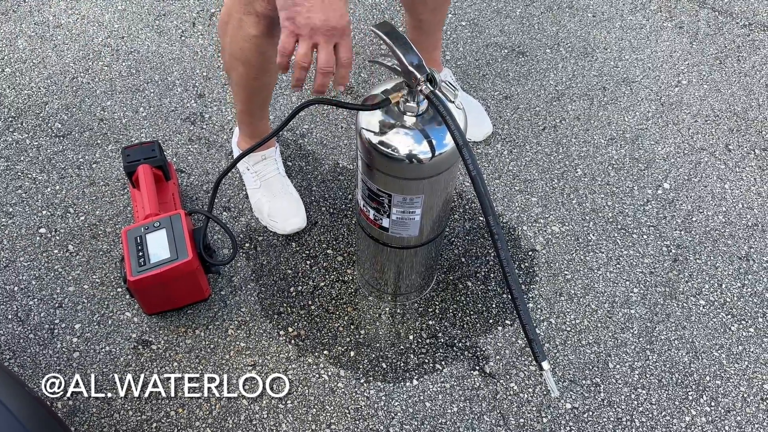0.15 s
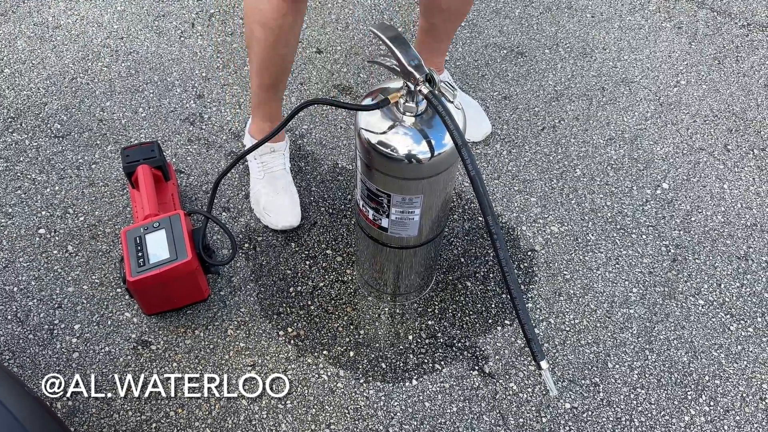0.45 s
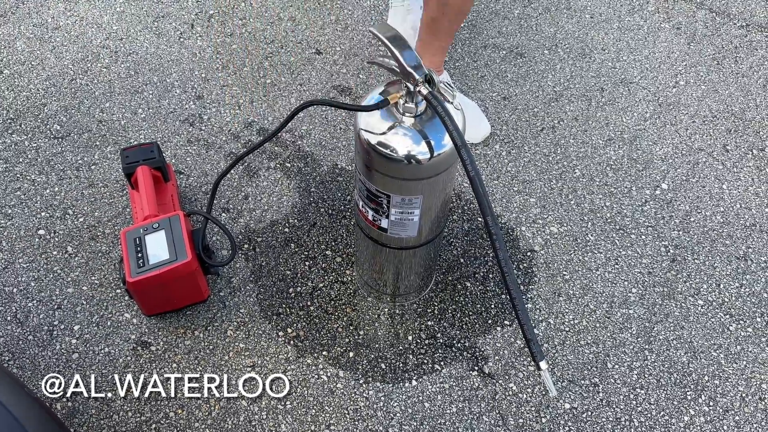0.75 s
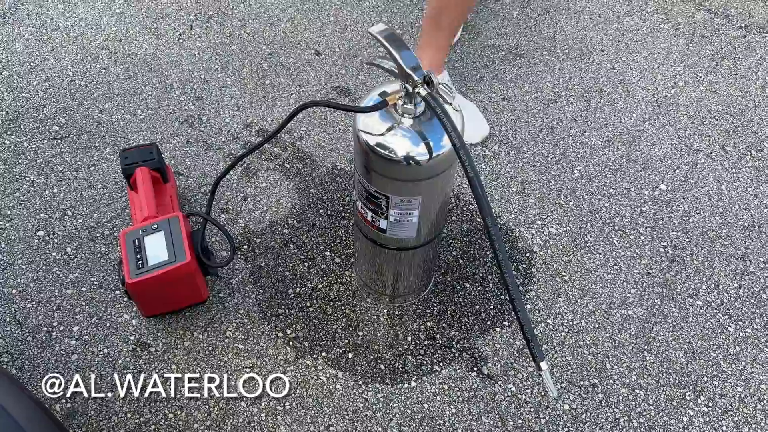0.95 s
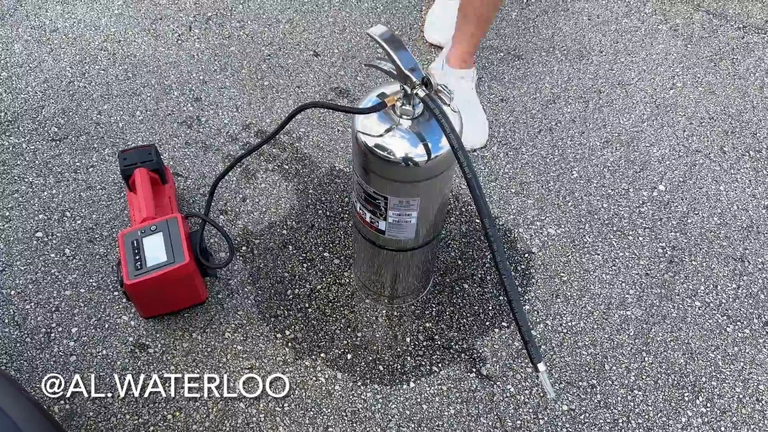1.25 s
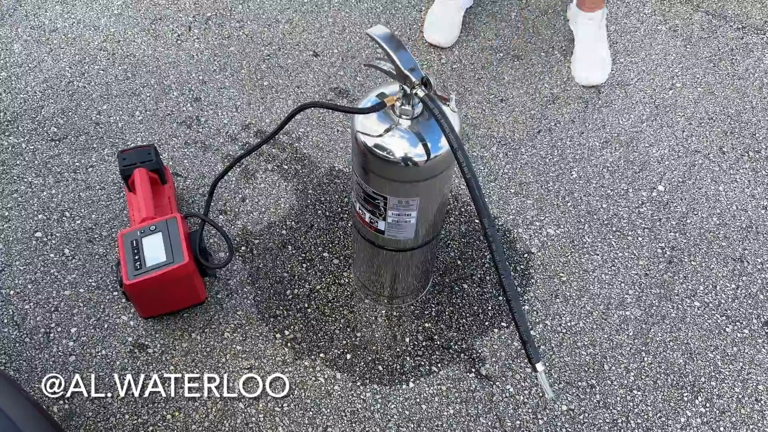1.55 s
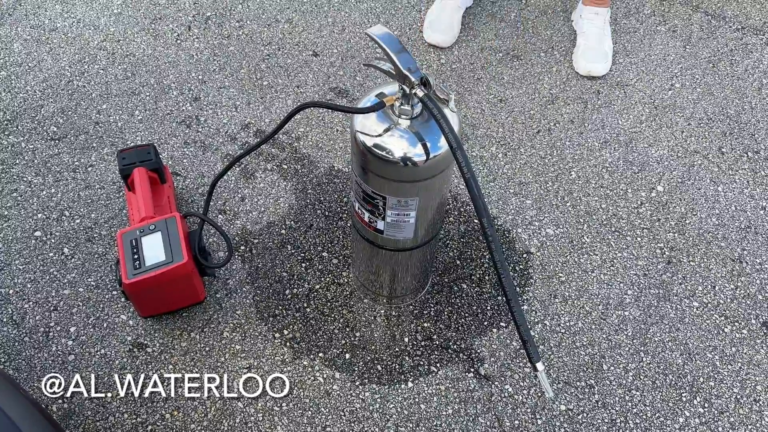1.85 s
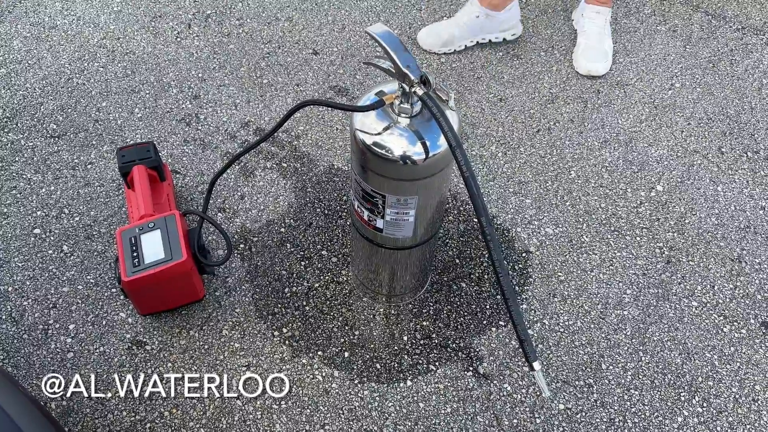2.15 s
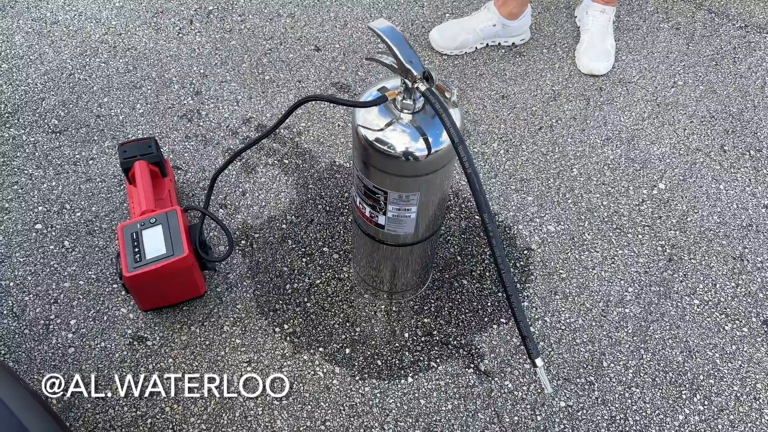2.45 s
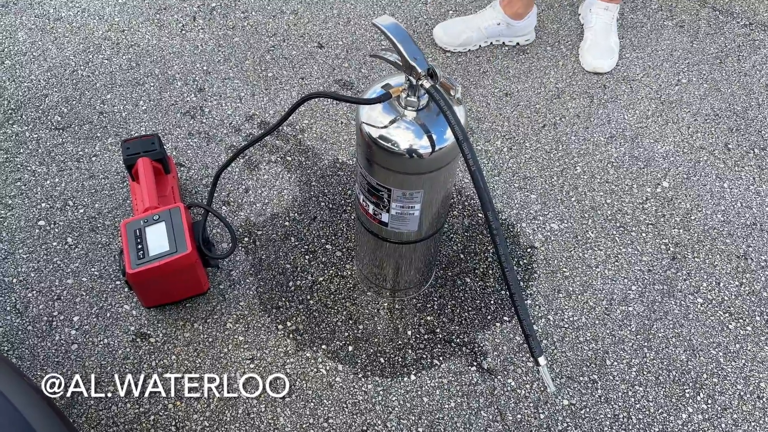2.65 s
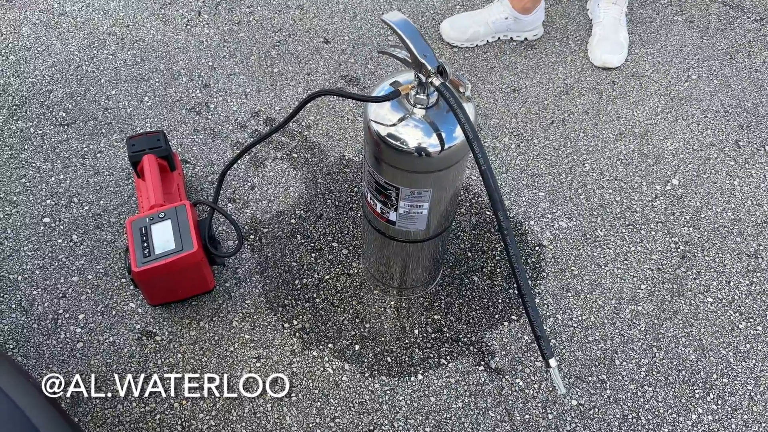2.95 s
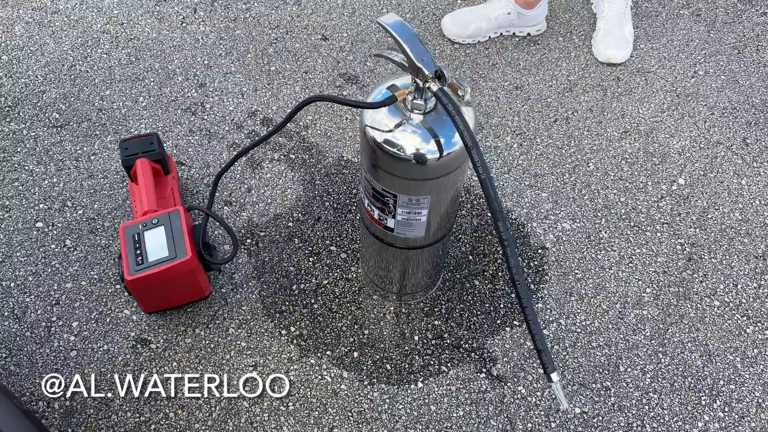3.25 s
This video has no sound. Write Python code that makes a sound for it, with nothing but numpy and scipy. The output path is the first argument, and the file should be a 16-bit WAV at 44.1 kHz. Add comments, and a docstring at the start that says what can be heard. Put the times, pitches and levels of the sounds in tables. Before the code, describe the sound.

A small electric air compressor buzzes steadily outdoors, with light wind and late metallic ticking.

```python
"""Open asphalt, a stereo pair of microphones close to a small electric piston compressor filling a steel tank.
From the start each stroke gives a thump, a valve knock and a puff of air, a loose metal part chatters
faintly, and wind buffets the microphones. The speed sags slightly as pressure builds.
From 1.8 s the loose part ticks, more and more often; just after 3 s the strongest gust comes in."""
import sys
import numpy as np
from scipy import signal
from scipy.fft import rfft, irfft, next_fast_len
from scipy.io import wavfile
from scipy.ndimage import uniform_filter1d

SR = 44100
rng = np.random.default_rng(int(sys.argv[2]) if len(sys.argv) > 2 else 0)


def store_wav(level_fs):
    """Save 16-bit WAV to argv[1]."""
    pcm = np.round(np.clip(np.atleast_2d(level_fs), -1, 1) * 32767)
    wavfile.write(sys.argv[1], SR, pcm.T.astype(np.int16))


N = 149940

RING_SAMPLES = 3000
VALVE_LEAD_TURNS = .07  # the valve acts this far ahead of the thump
# how hard the valve plate buzzes and rings: t/s, level change/dB
VALVE_EFFORT = [(0, 2), (.6, 0), (1.9, -0.5), (2.3, 0.5), (3.4, 3)]


def gain_of(db):
    return 10 ** (np.asarray(db) / 20)


def unit_rms(x):
    return x / np.sqrt(np.mean(x ** 2) + 1e-20)


def over_frequency(table, hz):
    f, value = np.transpose(table)
    return np.interp(np.log(hz + 1), np.log(f + 1), value)


def over_time(table, column=1):
    rows = np.array(table)
    return np.interp(np.arange(N) / SR, rows[:, 0], rows[:, column])


def drift(top_hz=3):
    """Slow random wander, rms 1."""
    t = np.arange(0, N + 256, 256) / SR
    rates = np.geomspace(.2, top_hz, num=12)
    slow = sum(np.sin(2 * np.pi * (f * t + rng.random())) / np.sqrt(f) for f in rates)
    return np.interp(np.arange(N) / SR, t, unit_rms(slow))


def stereo_noise(colour, likeness, pan=((1, 0), (2, 0))):
    """Coloured noise, partly alike at the two microphones, rms 1."""
    size = next_fast_len(N)
    hz = np.fft.rfftfreq(size, 1 / SR)
    a, b = rfft(rng.standard_normal((2, size)))
    like = np.clip(over_frequency(likeness, hz), -1, 1)
    tilt = gain_of(over_frequency(pan, hz) / 2)
    pair = np.array([a * tilt, (like * a + np.sqrt(1 - like ** 2) * b) / tilt])
    return unit_rms(irfft(pair * gain_of(over_frequency(colour, hz)), size)[:, :N])


def ring(hz, t60, rad=0):
    """One mode of struck metal dying away."""
    t = np.arange(RING_SAMPLES) / SR
    return gain_of(-60 * t / t60) * np.sin(2 * np.pi * hz * t + rad)


def crank_turns(start_hz=78.15, sag_hz_per_s=.1282):
    """Crank position, slowing as pressure builds; whole numbers are the thumps."""
    t = np.arange(N) / SR
    return -.078 + start_hz * t - sag_hz_per_s * t ** 2 / 2


def stroke_samples(lead_turns):
    return np.nonzero(np.diff(np.floor(crank_turns() + lead_turns)))[0]


def pump():
    """The piston's buzz: harmonics (orders) of the stroke rate, the high ones wavering more."""
    # harmonics of the pump body: order, left level/dB, right level/dB
    body_orders = [(1, -33.5, -34.5), (2, -34.5, -34.5), (3, -34, -35), (4, -29.5, -29), (5, -27.5, -28),
                   (6, -26.5, -26.5), (7, -24.5, -24.5), (8, -34, -34), (9, -34.5, -34), (10, -39, -40),
                   (11, -43, -48), (12, -46.5, -51), (13, -46.5, -50.5), (14, -48.5, -48), (15, -38, -39),
                   (16, -57, -53), (17, -55, -57), (18, -55.5, -51.5), (19, -52, -52), (20, -54, -52.5),
                   (21, -57, -54), (22, -64, -63), (23, -59, -66), (24, -49, -57), (25, -52, -59),
                   (26, -52, -61), (27, -44.5, -60.5), (28, -49, -52), (29, -53.5, -55), (30, -62.5, -59)]
    # buzz of the valve plate: order, left level/dB, right level/dB
    plate_orders = [(53, -70, -74), (54, -64, -68), (55, -58.5, -63.5), (56, -60, -66), (57, -65, -72),
                    (59, -68, -72), (60, -62, -69)]
    # timing of each band of harmonics within the stroke, shaping the thump and knock:
    # top order, lead on the thump/turns, lag at the right microphone/turns
    band_timing = [(3, 0, .012), (4, .025, .006), (7, 0, .006), (8, .022, .012), (12, .312, .015),
                   (15, .328, .01), (23, .31, .019), (25, .1825, .015), (32, .163, .003), (64, .03, 0)]
    # casing resonances shifting as pressure builds: order, level slope/(dB/s)
    casing_creep = [(8, 0), (9, -.7), (12, -1.6), (13, 2), (15, 0), (25, 0), (26, 2.5), (27, 0), (57, 0),
                    (60, 1.5)]
    # swell of the lowest hum: t/s, level change/dB
    hum = [(0, -13), (1.3, -1), (1.5, 0), (3.15, 3), (3.25, -8), (3.4, -11)]
    # wavering gear whine: t/s, left change/dB, right change/dB
    gear_whine = [(0, -6, -4), (.22, -6, -4), (.32, -1, 0), (.52, 1, 4), (.61, -7, -5), (.7, -4, 0),
                  (.88, -16, -19), (1.0, 1, -3), (1.17, -3, -6), (1.33, -1, 2), (1.46, -5, -3),
                  (2.5, 0, -1), (3.4, 7, 3)]
    # a rasp that swells and sinks: t/s, left change/dB, right change/dB
    rasp = [(0, -5, -8), (.4, -5, -6), (.55, 0, -8), (1.1, 3, 4), (1.3, -2, -10), (2.5, 0, -6), (2.9, 2, 6),
            (3.4, 0, 7)]
    turn, out = crank_turns(), np.zeros((2, N))
    shimmer = np.interp(turn + .5, np.arange(300), rng.standard_normal(300))  # stroke to stroke
    for order, *side_db in list(body_orders) + plate_orders:
        lead, lag = next(band[1:] for band in band_timing if order <= band[0])
        waver_rad = .012 * drift()
        waver_db = .7 + .0015 * min(order, 28) ** 2
        creep_db = np.interp(order, *np.transpose(casing_creep)) * (np.arange(N) - N / 2) / SR
        for side in range(2):
            db = side_db[side] + waver_db * drift() + creep_db + .31 * shimmer
            if order == 1:
                db += over_time(hum)
            elif order == 15:
                db += over_time(gear_whine, column=1 + side)
            elif order == 24:
                db += over_time(rasp, column=1 + side)
            elif order > 32:  # valve plate
                db += over_time(VALVE_EFFORT) + 1.5 * shimmer
            crank_rad = 2 * np.pi * (turn + lead - side * lag) + waver_rad + side * .008 * drift()
            out[side] -= np.sqrt(2) * gain_of(db) * np.cos(order * crank_rad)
    return out


def valve_knock(jitter_s=.00002, spread_db=1.5):
    """One uneven blow per stroke rings the valve plate."""
    # modes of valve plate and casing: f/Hz, t60/s, left level/dB, right level/dB
    plate_modes = [(4300, 0.026, -75, -73), (5860, 0.04, -64, -67), (6180, 0.041, -64.5, -66.5),
                   (8840, 0.054, -79, -68.5)]
    at = stroke_samples(VALVE_LEAD_TURNS)
    draws = rng.standard_normal((len(at), 1 + len(plate_modes)))
    at = np.clip(at + np.round(draws[:, 0] * jitter_s * SR).astype(int), 0, N - 1)
    out = np.zeros((2, N))
    for k, (hz, t60, left_db, right_db) in enumerate(plate_modes):
        blows = np.zeros(N)
        blows[at] = gain_of(spread_db * draws[:, k + 1])
        out += gain_of([[left_db], [right_db]]) * unit_rms(signal.oaconvolve(blows, ring(hz, t60))[:N])
    return gain_of(over_time(VALVE_EFFORT)) * out


def air_puffs(level_db=-39.5, puff_db=-11, decay_turns=.17):
    """Air hisses, with a puff each time the valve acts."""
    # spectrum of the air hiss, with a band near 10.4-12.3 kHz cut out by audio coding:
    # f/Hz, relative level/dB
    colour = [(200, -20), (550, -11), (1000, -22), (1700, -22.5), (2150, -22), (2700, -29), (3100, -30),
              (4400, -27), (5200, -34), (6000, -31.5), (7000, -33), (7900, -37.5), (9600, -35),
              (10200, -39), (10600, -76), (12100, -82), (12600, -36.5), (15500, -34.5)]
    # likeness of the hiss at the two microphones: f/Hz, correlation
    likeness = [(300, 1), (1400, 0.32), (6000, 0.2), (13000, 0.29)]
    # the low hiss sits to the left: f/Hz, left minus right/dB
    pan = [(700, 14.5), (2400, 5), (4400, 4.5), (8100, 2.5), (13000, -0.5)]
    puffs = gain_of(puff_db) * np.exp(-((crank_turns() + VALVE_LEAD_TURNS) % 1) / decay_turns)
    flow = unit_rms(1 + uniform_filter1d(puffs, size=20))
    return gain_of(level_db) * stereo_noise(colour, likeness, pan) * flow


def wind(lump_db=2.5):
    """Wind buffets the microphones: lumpy rumble, brighter flutter and a few single bumps."""
    # strength of the gusts: t/s, rumble level/dB, flutter level/dB
    gusts = [(0.0, -50, -50), (.27, -46, -35), (.66, -55, -44), (.85, -45, -37), (1.49, -42, -38),
             (1.62, -42, -46), (3.1, -37, -42), (3.2, -33, -32), (3.4, -27, -33)]
    # spectrum of the rumble: f/Hz, relative level/dB
    rumble_colour = [(10, -49), (25, -21.5), (40, 1.5), (60, 5), (90, 2), (130, -2.5), (250, -46.5),
                     (1000, -100)]
    # spectrum of the flutter: f/Hz, relative level/dB
    flutter_colour = [(20, -64.5), (50, -19), (100, -3.5), (150, -1), (250, -2.5), (350, -8), (600, -24.5),
                      (1200, -62.5), (4000, -110)]
    # single buffets: t/s, envelope peak/dB, f/Hz, length/s
    buffets = [(.25, -22.5, 79.5, 0.036), (1.155, -23, 72.5, 0.026), (2.325, -20, 75, 0.033),
               (2.808, -18, 190, 0.0075), (2.826, -15.5, 77.6, 0.036), (3.19, -23, 71.6, 0.032)]
    t = np.arange(N) / SR
    likeness = [(1, .55), (2, .55)]  # the same at all frequencies
    rumble_db = 2.5 + over_time(gusts) + lump_db * drift(top_hz=17)
    rumble = gain_of(rumble_db) * stereo_noise(rumble_colour, likeness)
    flutter_db = 3.5 + over_time(gusts, column=2) + lump_db * drift(top_hz=30)
    flutter = gain_of(flutter_db) * stereo_noise(flutter_colour, likeness)
    bumps = sum(gain_of(db) * np.exp(-(2 * (t - s) / length) ** 2) * np.sin(2 * np.pi * hz * (s - t))
                for s, db, hz, length in buffets)
    return rumble + flutter + bumps


def metal_tick(low_db, mid_db, hiss, snap_t60_s=.049, rise_s=.00074):
    """One blow on the loose part: a snap of noise and its modes, a little different each time."""
    # modes of the loose part: f/Hz, relative level/dB, t60/s
    modes = [(3047, 10.5, 0.031), (5910, -12.5, 0.032), (6900, -4, 0.045), (9050, -9.5, 0.036),
             (9480, -5.5, 0.048), (14400, -10, .012)]
    level_draw, pitch_draw, right_rad = rng.standard_normal((3, len(modes)))
    t = np.arange(hiss.shape[1]) / SR
    out = gain_of(-2 - 60 * t / snap_t60_s) * hiss
    for k, (hz, db, t60) in enumerate(modes):
        db += 1.5 * level_draw[k] + (hz < 4000) * low_db + (4000 < hz < 8000) * mid_db
        hz *= 1 + (.03 if hz < 4000 else .006) * pitch_draw[k]
        out += gain_of(db) * np.array([ring(hz, t60), ring(hz, t60, right_rad[k])])
    return out * np.minimum(t / rise_s, 1)


def loose_part(spread_db=2.5):
    """A loose metal part chatters faintly just after every thump and, later on, ticks loudly."""
    # spectrum of the tick's snap, with a band near 10.4-12.3 kHz cut out by audio coding:
    # f/Hz, relative level/dB
    snap_colour = [(2000, -20), (3000, 4), (7000, 4), (8000, -2.5), (10000, 2.5), (10500, -28.5),
                   (12000, -19), (12600, 3), (15500, -2)]
    # likeness of the snap at the two microphones: f/Hz, correlation
    snap_likeness = [(3000, 0.3), (8000, .3), (13000, .8)]
    # strength of the chatter: t/s, gain/dB
    chatter = [(0, -57.5), (2.4, -56), (2.6, -50), (2.9, -51), (3.2, -43.5), (3.4, -44)]
    # the loud blows: t/s, gain/dB, low mode change/dB, middle modes change/dB
    ticks = [(1.775, -45, -13, -6), (2.1097, -43, -16, -8), (2.4679, -40.5, -12, -8), (2.52, -46, -20, -12),
             (2.5971, -45, -7, -8), (2.6108, -42, -14, 0), (2.6752, -38, -8, -12), (2.7263, -41, -13, 5),
             (2.8305, -44, -7, 3), (2.9563, -38.5, -7, 1), (3.0345, -37.5, -7.5, 4), (3.088, -40, -15, 5),
             (3.1628, -39, -6, 2), (3.2137, -36, -15, -2), (3.266, -41, -8, 3), (3.281, -40, -15, -8),
             (3.3173, -42, -9, 0), (3.393, -39, -6, 0)]
    out = np.zeros((2, N + RING_SAMPLES))
    hiss = np.tile(stereo_noise(snap_colour, snap_likeness), 2)
    snaps = np.split(hiss[:, :24 * RING_SAMPLES], 24, axis=1)
    taps = [metal_tick(low_db=-12.5, mid_db=0, hiss=snap) for snap in snaps]
    strokes = stroke_samples(lead_turns=-.13)
    stroke_db = over_time(chatter)[strokes] + spread_db * rng.standard_normal(len(strokes))
    for at, db, k in zip(strokes, stroke_db, rng.integers(0, len(taps), len(strokes))):
        out[:, at:at + RING_SAMPLES] += gain_of(db) * taps[k]
    for s, db, low_db, mid_db in ticks:
        at = round(s * SR)
        span = slice(at, at + RING_SAMPLES)
        out[:, span] += gain_of(db) * metal_tick(low_db, mid_db, hiss[:, span])
    return out[:, :N]


def scene():
    """The compressor in the open, with no echo, and wind on the microphones."""
    compressor = pump() + valve_knock() + air_puffs() + loose_part()
    return compressor + wind()


def record(dry):
    """The recorder cuts the treble above 15.8 kHz."""
    lowpass = signal.firwin(511, 15800, window=("kaiser", 9), fs=SR)
    return signal.oaconvolve(dry, lowpass[None], "same")


dry = scene()
out = record(dry)
store_wav(out)
```